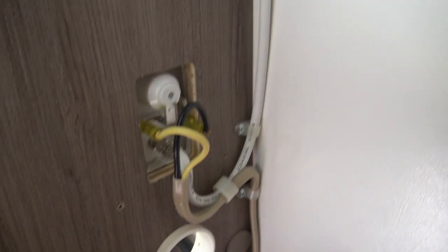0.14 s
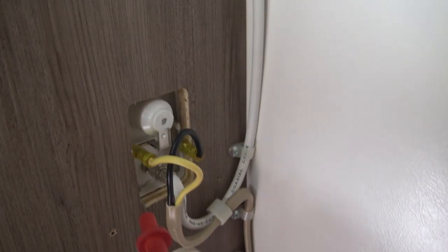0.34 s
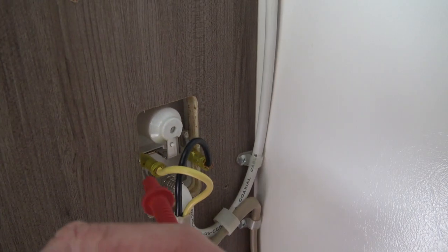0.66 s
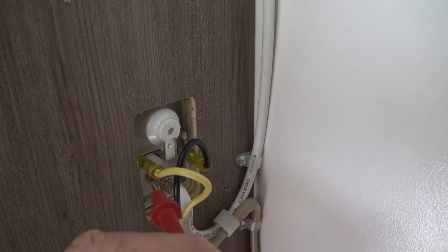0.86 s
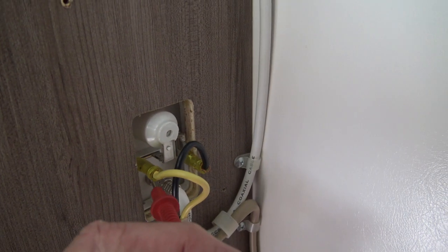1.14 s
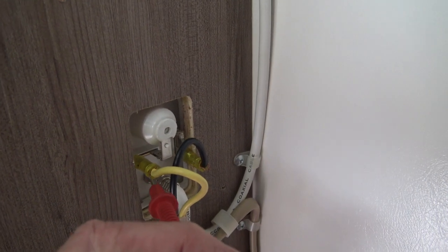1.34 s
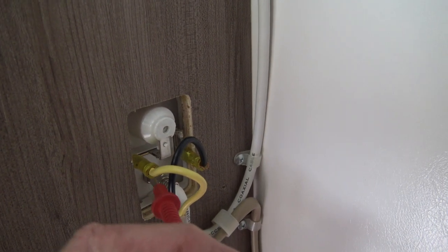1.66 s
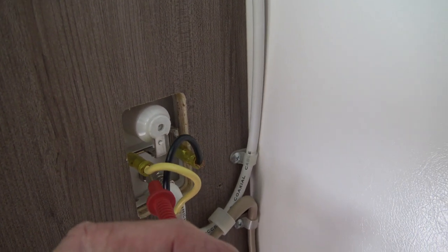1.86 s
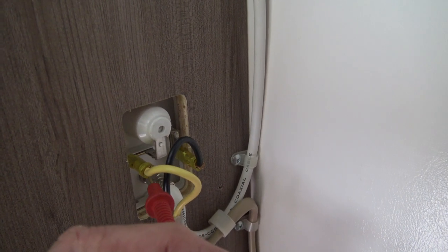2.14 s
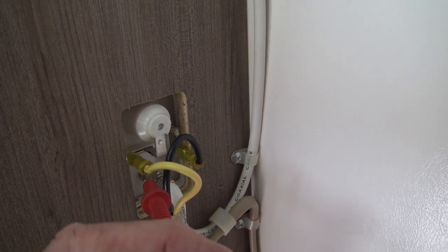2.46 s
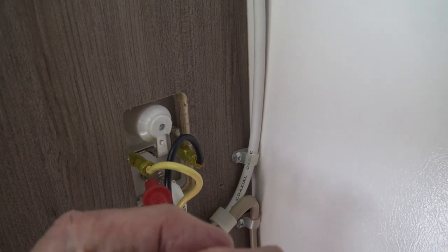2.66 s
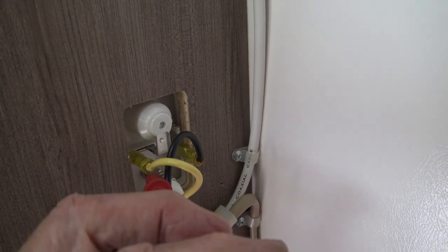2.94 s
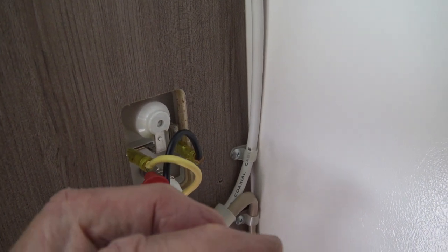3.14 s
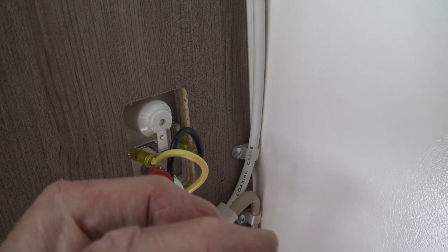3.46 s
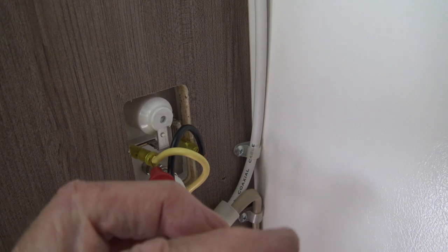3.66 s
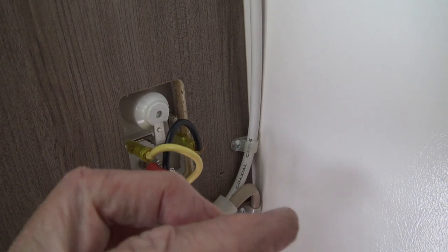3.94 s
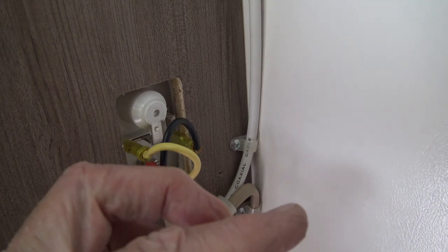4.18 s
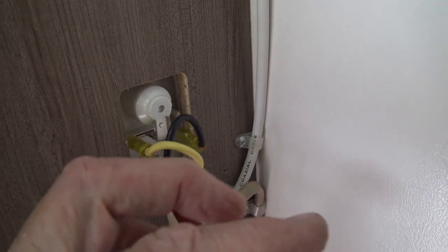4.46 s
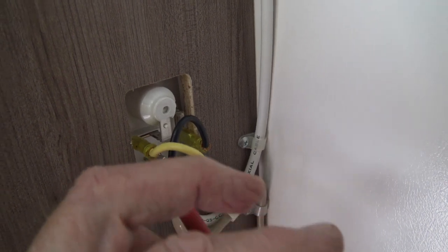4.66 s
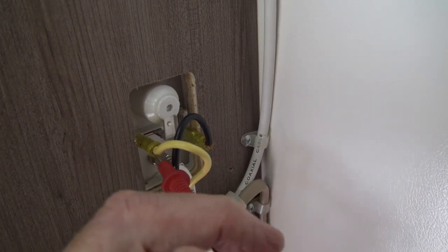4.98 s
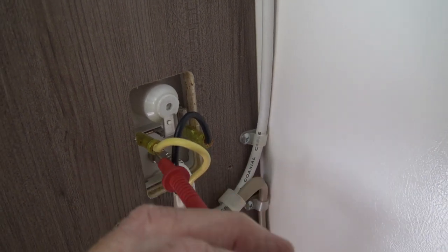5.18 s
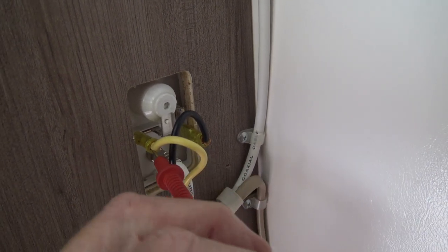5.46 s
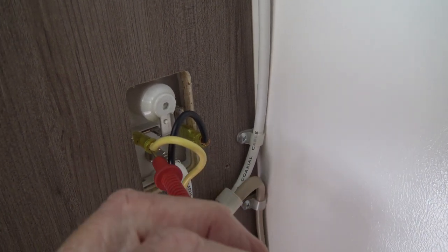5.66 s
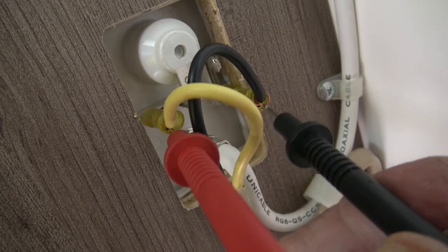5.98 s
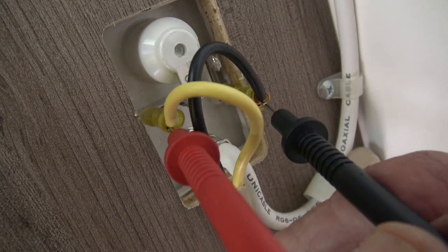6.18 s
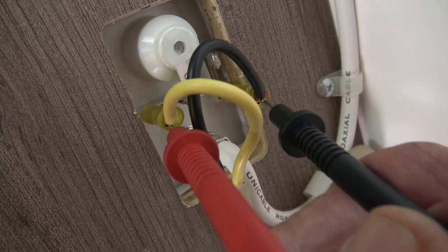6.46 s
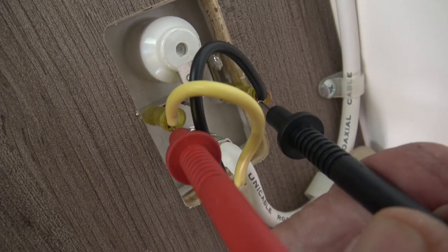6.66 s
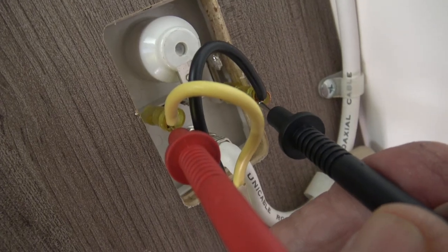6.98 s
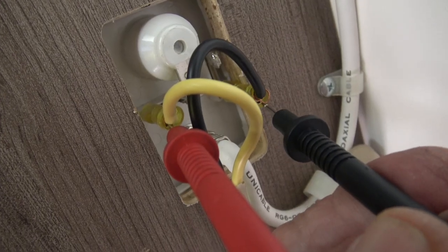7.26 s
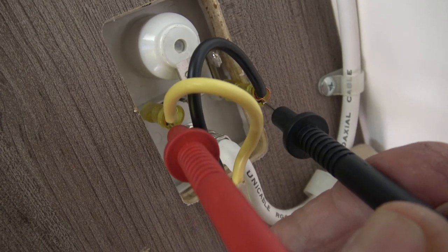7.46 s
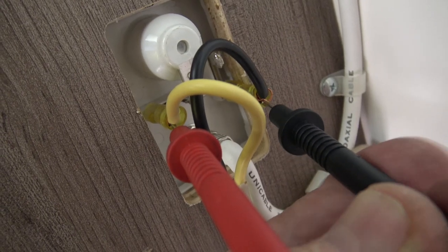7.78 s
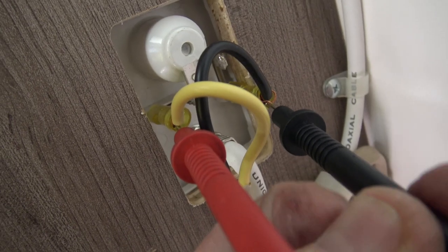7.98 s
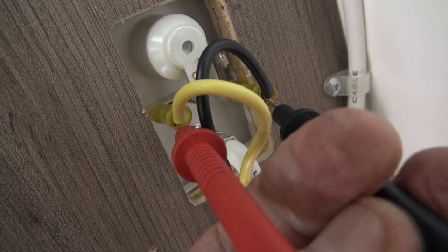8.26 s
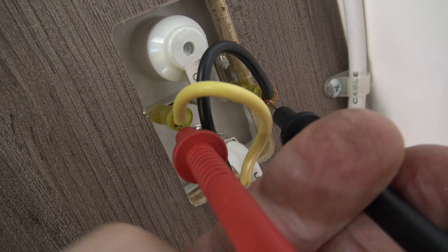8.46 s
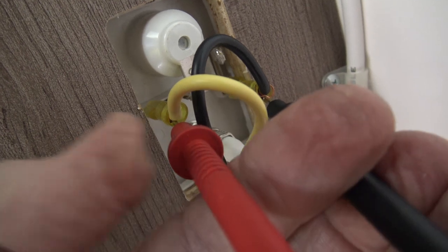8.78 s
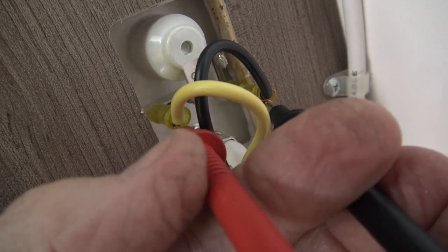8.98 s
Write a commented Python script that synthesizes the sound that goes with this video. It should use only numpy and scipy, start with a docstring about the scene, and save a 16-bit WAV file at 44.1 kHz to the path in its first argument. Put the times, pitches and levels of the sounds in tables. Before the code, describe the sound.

A quiet small cabin with a faint low hum, swelling slightly at the start and fading. At 0-0.4 s, a rustle of skin and leads, soft panel bumps and a tiny squeak; at 0.6 s, crisp metal ticks. Faint scraping follows, then a run of clicks and hollow wooden thuds at 1.5-1.9 s with a thin ping. The strongest tick and booming knock come at 2.8 s, followed by a short scrape. Lighter taps lead to another deep knock at 3.75 s and smaller ones until 4.4 s. Around 4.7-5.5 s, a finger slides over ribbed plastic with breathy, rising whistles. A bright tick at 5.75 s, then shorter, duller clicks on a connector, with scratches near 6.4 s and a sharp hit at 6.6 s. Taps at 7.0 s and a quick scrape-and-knock cluster at 7.6 s, with small treble puffs, thin out after 8.4 s. Close microphone, very short echo.

```python
"""A thin hollow wooden panel booms as hands push test probes against it: damped sines with a soft rise.
Probe tips tick and scrape on a metal wall plate, later on a connector: noise bursts and grains ring metal modes.
A finger slides over ribbed plastic with a gliding, fuzzy whistle; faint squeaks, pings and puffs of treble.
Skin and leads rustle as shaped noise; a quiet cabin hums as steady noise with a low swaying band,
and a short echo of sparse taps follows the close sounds."""
import sys
import numpy as np
from scipy import signal
from scipy.io import wavfile
from scipy.ndimage import uniform_filter1d

SR = 44100
rng = np.random.default_rng(int(sys.argv[2]) if len(sys.argv) > 2 else 0)


def invert_db(level):
    """Linear amplitude ratio for a level in decibels (20 dB per decade), elementwise."""
    return 10 ** (np.asarray(level, dtype=float) / 20)


def to_wav(sig):
    """Store sig (one row per channel, or 1-D mono) as 16-bit WAV at the path in sys.argv[1].

    Samples outside -1..1 are clipped; the rate is SR.
    """
    pcm = np.clip(np.atleast_2d(sig), -1, 1) * 32767
    pcm = np.round(pcm).astype(np.int16)
    wavfile.write(sys.argv[1], SR, pcm.T)  # frames by channels


N = 402015

# wooden panel modes: pitch_hz, level_db, undamped_t60_s, left_over_right_db
PANEL_LOW = [(38.8, -28, 1, 3), (68, -18, 0.042, -4), (118.2, 8, 0.2, 1), (143.7, 4, 0.23, 2)]
PANEL_HIGH = [(201.7, -19, 0.15, 2), (299.9, 9, 0.19, 2.9), (395.4, -1.5, 0.15, 1.5),
              (445.2, 0.5, 0.14, 2.8)]
# metal wall plate modes: pitch_hz, level_db, free_t60_s
PLATE = [(713.6, -8, 0.37), (881, -4, 0.16), (1091, -10.5, 0.33), (1207, 8.5, 0.031), (1482, 3.5, 0.052),
         (1765, -8, 0.065), (1960, 6.5, 0.015), (2240, -11, 0.083), (2710, 1, 0.012), (3500, -11, 0.015)]
# crimped connector modes: pitch_hz, level_db, free_t60_s
CONNECTOR = [(739, -9, 0.071), (695, 0.5, 0.0064), (1740, -14.5, 0.19), (1950, -2.5, 0.019),
             (2750, -9, 0.025), (3300, -15, 0.0075), (4050, -17.5, 0.024)]
REACH_S = 5.95  # from here the tips touch the connector instead of the plate
# how busily the hands move, as the rustle level: time_s, level_db
BUSY = [(0, -26.5), (.04, -38.5), (.3, -37.5), (.5, -48), (.75, -56), (1.5, -56), (2.6, -59.5), (3.3, -56),
        (3.7, -61), (4.0, -52.5), (4.6, -60.5), (5.15, -53.5), (5.42, -53.5), (5.7, -60), (7.7, -64),
        (8.2, -56), (8.4, -60), (9.12, -65.5)]


def evened(x):
    """Scales to unit rms."""
    return x / np.sqrt(np.mean(x ** 2) + 1e-20)


def sides(left_over_right_db):
    """Left and right gains, as a column."""
    return invert_db([[left_over_right_db / 2], [-left_over_right_db / 2]])


def along(rows, column=1):
    """Interpolates a table column over the whole scene."""
    return np.interp(np.arange(N) / SR, [r[0] for r in rows], [r[column] for r in rows])


def add(mix, start_s, sound):
    """Adds a sound in place, cut at the end of the mix."""
    part = mix[:, round(start_s * SR):][:, :sound.shape[1]]
    part += sound[:, :part.shape[1]]


def band(x, lo_hz, hi_hz):
    """Butterworth band-pass."""
    return signal.sosfilt(signal.butter(2, [lo_hz, hi_hz], "band", fs=SR, output="sos"), x)


def ring(modes, count, stretch=1):
    """Each mode as a dying sine, one row a mode; stretch multiplies t60."""
    hz, db, t60_s = np.transpose(modes)[:3, :, None]
    t = np.arange(count) / SR
    return invert_db(db - 60 * t / (t60_s * stretch)) * np.sin(2 * np.pi * hz * t)


def panned(modes, rows):
    """Mixes rung panel modes to two channels, each at its own balance."""
    return np.hstack([sides(m[3]) for m in modes]) @ rows


def grit(per_s, spread_db):
    """Sparse clicks of random sign, a few of them large."""
    size = invert_db(spread_db * np.minimum(rng.exponential(1, N), 4)) * rng.standard_normal(N)
    return size * (rng.random(N) < per_s / SR)


def wander(rows, count, db, smooth_s):
    """Slow random gains, one row each, with an rms of db around 0 dB."""
    width = round(smooth_s * SR / 16)
    noise = rng.standard_normal((rows, count // 16 + 1))
    drift = evened(uniform_filter1d(uniform_filter1d(noise, width), width))
    return np.repeat(invert_db(db * drift), 16, axis=1)[:, :count]


def air(spectrum, patchy_db, apart=1):
    """Two-channel noise of a given spectrum with drifting patches; apart scales the channel difference."""
    # likeness of left and right: pitch_hz, correlation
    likeness = [(60, 0.99), (380, 0.76), (2380, 1), (15000, 0.44)]
    hz = np.fft.rfftfreq(1024, 1 / SR)

    def read(points):
        point_hz, value = np.transpose(points)
        return np.interp(np.log(hz + 1), np.log(point_hz + 1), value)[:, None]

    a, b, c, d, patches = rng.standard_normal((N // 256 + 5, 513, 5)).T
    patches = evened(uniform_filter1d(uniform_filter1d(patches, size=12, axis=0), size=10, axis=1))
    same = np.clip(1 - apart * (1 - read(likeness)), -1, 1)
    shared = np.sqrt((1 + same) / 2) * (a + 1j * b)
    own = np.sqrt((1 - same) / 2) * (c + 1j * d)
    z = np.array([shared + own, shared - own]) * invert_db(read(spectrum) + patchy_db * patches)
    return evened(signal.istft(z, nperseg=1024, noverlap=768)[1][:, :N])


def cabin_hum():
    """Steady shaped noise of the quiet cabin."""
    # relative density: pitch_hz, density_db_per_hz
    cabin_spectrum = [(20, -22), (40, -6), (65, 4), (120, -6), (200, -32), (310, 6), (500, -20), (1000, -9),
                      (2500, -35), (6000, -23), (12000, -29), (16000, -37)]
    return invert_db(-55.5) * air(cabin_spectrum, patchy_db=.6)


def sway():
    """A low hum that swells and fades: narrow noise under a slow level curve."""
    # time_s, level_db
    sway_levels = [(0, -44.5), (1.1, -54), (2.5, -55), (4, -60), (6.2, -61), (9.12, -61.5)]
    noise = rng.standard_normal(N)
    return invert_db(along(sway_levels)) * evened(band(band(noise, 59.3, 76.4), 59.3, 76.4))


def rustle():
    """Skin and leads rub: shaped noise that follows how busily the hands move."""
    # relative density: pitch_hz, density_db_per_hz
    cloth_spectrum = [(290, -13), (500, -21), (1250, -4), (2200, -4), (3860, -7), (11300, -13.5),
                      (16000, -18)]
    return invert_db(along(BUSY)) * air(cloth_spectrum, patchy_db=1.2, apart=.17)


def cabin_echo(x):
    """Sparse taps of random sign dying quickly in the small padded cabin, different in each channel."""
    slots = np.arange(120, 9000, 22)
    at = slots + rng.integers(0, 22, (2, len(slots)))
    taps = np.zeros((2, 9100))
    np.put_along_axis(taps, at, rng.choice([-1., 1.], at.shape) * invert_db(-60 * at / SR / 0.047), 1)
    taps = band(taps, 220, .45 * SR)
    return signal.oaconvolve(x, taps / np.linalg.norm(taps[0]), axes=1)[:, :N]


def puffs():
    """A lead flicks past: short soft-edged bursts of high noise."""
    # start_s, length_s, level_db, lowest_hz
    puff_rows = [(2.219, 0.039, -57, 5000), (2.482, 0.014, -56, 5000), (3.48, 0.023, -55, 5000),
                 (4.477, 0.023, -55.5, 4000), (6.321, 0.018, -53, 4950), (6.779, 0.014, -58.5, 7000),
                 (7.32, 0.021, -56.5, 5000), (7.822, 0.049, -49.5, 6000), (8.063, 0.01, -51.5, 7000),
                 (8.311, 0.041, -55.5, 4930), (8.55, 0.0076, -54, 3000)]
    out = np.zeros((2, N))
    for s, seconds, db, lo_hz in puff_rows:
        noise = rng.standard_normal(round(seconds * SR))
        shape = signal.windows.tukey(len(noise), .6)
        add(out, s, invert_db(db) * evened(band(noise, lo_hz, 12400)) * shape * sides(0))
    return out


def squeaks():
    """Faint metallic squeaks: short soft-edged sines."""
    # start_s, length_s, peak_db, pitch_hz
    squeak_rows = [(0.268, 0.17, -46, 2350), (7.746, 0.016, -51, 3250), (7.876, 0.017, -56, 3300),
                   (7.883, 0.04, -57, 2840)]
    out = np.zeros((2, N))
    for s, seconds, db, hz in squeak_rows:
        t = np.arange(0, seconds, 1 / SR)
        shape = signal.windows.tukey(len(t), .6)
        add(out, s, invert_db(db) * np.sin(2 * np.pi * hz * t) * shape * sides(0))
    return out


def pings():
    """A bare probe tip flicked free rings briefly in its own modes."""
    # start_s, level_db
    ping_rows = [(1.796, -29), (1.884, -44.5)]
    # pitch_hz, level_db, t60_s
    tip_modes = [(3080, -2, .025), (3430, 0, .03), (3850, -3, .025)]
    out = np.zeros((2, N))
    for s, db in ping_rows:
        add(out, s, invert_db(db) * ring(tip_modes, count=4000).sum(0) * sides(-1))
    return out


def slides():
    """A finger on ribbed plastic: a noisy resonance glides up; a second one and a hiss swell and fade over it."""
    # start_s, length_s, level_db
    slide_rows = [(4.727, 0.25, -58.5), (5.057, 0.25, -48.5), (5.262, 0.24, -46.5)]
    # bandwidth_hz of the lower and the upper resonance
    widths_hz = 340, 800
    from_hz, to_hz, glide_s, upper_ratio = 3500, 4120, 0.041, 1.3
    rise_s, fade_db = 0.035, -23.5
    out = np.zeros((2, N))
    for s, seconds, db in slide_rows:
        t = np.arange(0, seconds, 1 / SR)
        hz = to_hz + (from_hz - to_hz) * np.exp(-t / glide_s)
        noise = rng.standard_normal((6, len(t)))
        wobble = np.array([signal.lfilter([1], [1, -np.exp(-np.pi * width / SR)], noise[k] + 1j * noise[k + 2])
                           for k, width in enumerate(widths_hz)])
        phase = 2 * np.pi * np.cumsum(hz * [[1], [upper_ratio]], axis=1) / SR
        low, high = evened((wobble * np.exp(1j * phase)).real)
        swell = np.sin(np.pi * (t / seconds) ** 1.25) ** 2
        hiss = swell * (1.2 * high + 0.8 * evened(band(noise[4:], 4600, 7000)))
        shape = np.minimum(t / rise_s, 1) * invert_db(db + fade_db * (t / seconds) ** 2)
        add(out, s, shape * (low + hiss) * signal.windows.tukey(len(t), .3))
    return out


def drag():
    """Dense slips of the tips ring the metal: a faint creep that follows the rustle, and distinct strokes."""
    # strokes of a tip: start_s, length_s, level_db, swell_db from start to end
    stroke_rows = [(0.827, 0.12, -48, 0), (1.289, 0.11, -47, 12), (2.212, 0.097, -55, -21),
                   (2.815, 0.07, -36.5, -20), (3.34, 0.05, -49.5, -3), (3.859, 0.061, -50.5, 1),
                   (4.324, 0.81, -62, -3), (5.978, 0.11, -65, -5), (6.337, 0.093, -41.5, 16),
                   (6.472, 0.098, -39.5, 10), (6.551, 0.087, -50, 9), (7.35, 0.067, -54.5, -7),
                   (7.582, 0.034, -29.5, 21), (8.145, 0.23, -66, 15)]
    quiet_db, creep_db, creep_share = -59, -63, 0.76  # creep_db at a rustle of quiet_db; dB per dB of rustle
    judder_db, judder_s = 1.5, .004  # a dragged tip stutters
    wander_db, wander_s = 3.5, .02  # favours now one mode, now another
    bend_share, bend_s = .04, .03  # and its changing pressure bends their pitch
    rub_damping = .4  # a resting tip shortens the ring of the metal to this share

    t = np.arange(N) / SR
    level = invert_db(creep_db + creep_share * (along(BUSY) - quiet_db))
    catches = signal.lfilter([1], [1, -np.exp(-1 / (0.0043 * SR))], abs(grit(12.0, 1.8)))
    level *= 1 + .5 * catches
    for start, seconds, db, swell_db in stroke_rows:
        gate = np.clip(np.minimum((t - start) / 0.0096, (start + seconds - t) / 0.028), 0, 1)
        level += gate * invert_db(db + swell_db * np.clip((t - start) / seconds - .5, -.5, .5))
    level *= wander(1, N, judder_db, judder_s)[0]

    slips = band(band(grit(14000, 1.2), 230, 4700), 125, 6700)
    before, after = np.split(slips, [round(REACH_S * SR)])
    rung = []
    for part, modes in ((before, PLATE), (after, CONNECTOR)):
        responses = ring(modes, count=2000, stretch=rub_damping)
        rows = signal.oaconvolve(part[None], responses, axes=1)[:, :len(part)]
        rung.append(evened((rows * wander(len(modes), len(part), wander_db, wander_s)).sum(0)))
    # reading the ring at a varying speed bends its pitch
    read_at = np.cumsum(wander(1, N, 20 * np.log10(1 + bend_share), bend_s))
    bent = np.interp(read_at * (N - 1) / read_at[-1], np.arange(N), np.hstack(rung))
    return level * (bent + 0.27 * evened(slips)) * sides(-1.2)


def ticks():
    """Probe tips strike metal and plastic: three noise bands, the treble dying first, plus rung metal modes."""
    # start_s, level_db, hardness (0 a plain knock, 1 a bare tip on metal)
    tick_rows = [(0.243, -43, -0.42), (0.3281, -34.5, 0.066), (0.605, -25.5, 0.56), (0.636, -32.5, 0.54),
                 (1.1006, -44, 0.31), (1.4655, -34.5, 0.56), (1.532, -30.5, 0.26), (1.594, -38, 0.68),
                 (1.646, -35.5, 0.21), (1.7122, -27, 0.43), (1.796, -43.5, 1.1), (1.851, -46.5, 0.51),
                 (1.883, -43.5, 0.22), (2.746, -40, -0.33), (2.8055, -12.5, 0.23), (2.8658, -30, 0.44),
                 (3.084, -34, 0.85), (3.277, -36.5, 0.31), (3.372, -53.5, -0.59), (3.619, -46.5, -0.89),
                 (3.7482, -33.5, 0.66), (3.957, -31.5, 0.54), (4.022, -60, 1.55), (4.2198, -37, 0.16),
                 (4.3128, -39, 0.32), (4.401, -50.5, -0.96), (4.844, -43, -0.15), (5.2472, -41.5, -0.75),
                 (5.4928, -62, 1.48), (5.7408, -29, 1.3), (5.875, -34.5, 0.41), (6.034, -51.5, -0.44),
                 (6.1638, -36, 0.2), (6.346, -41.5, 0.53), (6.4193, -36.5, 0.31), (6.573, -22, 0.27),
                 (6.5806, -28.5, 0.85), (7.012, -26.5, 0.18), (7.111, -31.5, 0.28), (7.2053, -43.5, -0.12),
                 (7.2903, -41.5, 0.28), (7.3642, -40.5, 0.22), (7.582, -33, 0.29), (7.6012, -26.5, 0.17),
                 (7.625, -23.5, 0.12), (7.7632, -38, -0.024), (7.801, -49.5, 0.78), (7.8232, -38.5, -0.29),
                 (8.043, -38, -0.51), (8.2022, -40, -0.46), (8.2606, -35.5, 0.13)]
    usual_db, bright_loss_per_db = -44, 0.2962  # blows above usual_db gain less treble than body
    spot_db, spot_detune = 3, .02  # every contact lands elsewhere, weighting and shifting the modes anew
    out, t = np.zeros((2, N)), np.arange(4000) / SR
    snap = 1 + 1.05 * np.exp(-t / 0.0017)  # the first contact stands out of the burst

    def fade(t60_s, rise_s):
        return invert_db(-60 * t / t60_s) * (1 - np.exp(-t / rise_s))

    for s, db, hardness in tick_rows:
        # harder contacts sit higher, lose their dull part, gain treble and build up faster
        hz = 1847 * 2 ** hardness
        dull_db = 2 - 13 * hardness
        bright_db = -18.5 + 19 * hardness - bright_loss_per_db * (db - usual_db)
        rise_s = 0.001 / 2 ** (1.83 * hardness)
        noise = rng.standard_normal((3, 4000))

        modes = np.array(PLATE if s < REACH_S else CONNECTOR, float)
        shift, weight = rng.standard_normal((2, len(modes)))
        modes[:, 0] *= 1 + spot_detune * shift
        modes[:, 1] += spot_db * weight
        metal = signal.fftconvolve(noise[0], ring(modes, count=2000).sum(0))[:4000]
        body = noise[1] + 0.65 * evened(metal)

        dull = invert_db(dull_db) * evened(band(body, 237, 784)) * fade(0.1, rise_s)
        middle = evened(band(body, hz / 4.77, hz * 1.25)) * fade(0.079, rise_s) * snap
        bright = invert_db(bright_db) * evened(band(noise[2], 3500, 10500)) * fade(0.064, 1.7 * rise_s) * snap
        # clear ring of the struck metal, damped to a share of its free t60
        knock = ring(modes, count=4000, stretch=.6).sum(0)
        struck = invert_db(7) * knock / abs(knock).max() * (1 - np.exp(-t / rise_s))
        add(out, s, invert_db(db) * sides(-0.67) * (dull + middle + bright + struck))
    return out


def panel_tremble():
    """A resting hand shakes the panel all the time: small clicks ring its modes."""
    # time_s, lower_modes_db, upper_modes_db
    lean_levels = [(0, -49.5, -42.5), (.5, -52, -54.5), (2.6, -53, -60.5), (4.1, -49.5, -51),
                   (4.7, -42, -41.5), (5, -52, -56), (6, -51, -52), (6.7, -51, -49), (7.5, -53, -57.5),
                   (8.4, -53, -46.5), (9.12, -54.5, -78)]
    out = np.zeros((2, N))
    for column, modes in enumerate((PANEL_LOW, PANEL_HIGH), 1):
        shake = band(grit(500, 1.5), 70, 900)
        response = panned(modes, ring(modes, count=9000))
        tremble = signal.oaconvolve(shake[None], response, axes=1)[:, :N]
        out += invert_db(along(lean_levels, column)) * evened(tremble)
    return out


def panel_pushes():
    """Each push rings the panel modes after a soft rise; the flesh of the hand adds a broad dull puff."""
    # start_s, level_db, upper_over_lower_db, t60_factor (damping by the hand)
    push_rows = [(0.26, -26.5, -34, 0.41), (0.289, -32, -6.5, 0.27), (0.325, -23, -15, 0.31),
                 (0.37, -32.5, -14, 0.54), (0.607, -44.5, 12, 0.74), (1.532, -37.5, 2, 0.73),
                 (1.591, -21, -8, 0.66), (1.711, -19, -6.5, 0.65), (1.854, -36, -3, 0.66),
                 (2.08, -35, -5, 0.62), (2.23, -36, 4, 0.71), (2.743, -28.5, 0.5, 1.0),
                 (2.805, -7.5, -9.5, 0.75), (2.832, -13.5, -15.5, 0.65), (2.865, -31, -20, 1),
                 (3.272, -21, -14, 0.77), (3.354, -25, -10.5, 0.73), (3.616, -26.5, -10, 0.89),
                 (3.689, -26, -9.5, 0.93), (3.744, -7.5, -8, 0.79), (3.95, -13, -17, 0.85),
                 (3.984, -22.5, -16, 0.41), (4.185, -28.5, -19, 0.62), (4.217, -17, -4.5, 0.78),
                 (4.304, -29, 0.5, 0.92), (4.391, -34.5, 5.5, 0.75), (4.806, -34, -2, 1.0),
                 (4.947, -32, -7, 0.58), (5.179, -29, -14, 0.55), (5.249, -21.5, -3.5, 0.58),
                 (5.88, -25.5, -5.5, 0.55), (6.162, -36, -1, 0.55), (6.425, -25.5, -3.5, 0.48),
                 (6.578, -23, -2, 0.55), (6.91, -45, 13, 0.79), (7.016, -23.5, -4, 0.59),
                 (7.363, -39.5, 2, 0.97), (7.599, -17, -13.5, 0.48), (7.622, -34, 1, 0.53),
                 (7.762, -35, 0, 0.5), (7.826, -25, -7, 0.63), (8.043, -20, -0.5, 0.58),
                 (8.205, -29, -3.5, 0.77), (8.26, -32.5, 6, 0.51), (8.349, -32.5, -4, 0.56)]
    light_push_db, rise_doubles_per_db = -30, 0.18  # lighter pushes wake the upper modes more slowly
    out, t = np.zeros((2, N)), np.arange(9000) / SR
    for s, db, upper_db, damping in push_rows:
        # each push lands elsewhere and weights the modes anew
        spot_high = invert_db(1.2 * rng.standard_normal((len(PANEL_HIGH), 1)))
        spot_low = invert_db(0.8 * rng.standard_normal((len(PANEL_LOW), 1)))
        high_rise_s = 0.0087 * 2 ** (rise_doubles_per_db * max(light_push_db - db, 0))
        low = spot_low * ring(PANEL_LOW, count=9000, stretch=damping) * (1 - np.exp(-(t / 0.014) ** 2))
        high = spot_high * ring(PANEL_HIGH, count=9000, stretch=damping) * (1 - np.exp(-(t / high_rise_s) ** 2))
        puff = evened(band(rng.standard_normal(9000), 160, 392))
        puff = puff * invert_db(-12.5 - 60 * t / 0.16) * (1 - np.exp(-t / 0.0024))
        boom = panned(PANEL_LOW, low) + invert_db(upper_db) * panned(PANEL_HIGH, high)
        add(out, s, invert_db(db) * (puff * sides(2.2) + boom))
    return out


def scene():
    """Sums the background, the close sounds with their echo, and the panel."""
    background = cabin_hum() + sway() + rustle()
    near = puffs() + squeaks() + pings() + slides() + drag() + ticks()
    panel = panel_tremble() + panel_pushes()
    return background + near + invert_db(-17.0) * cabin_echo(near) + panel


def band_limit(x):
    """A steep low-pass at the top of the band."""
    return signal.sosfilt(signal.butter(12, 16980, fs=SR, output="sos"), x)


def record(dry):
    """Limits the band with a steep linear-phase low-pass."""
    edge_hz = 15950
    lowpass = signal.firwin(511, edge_hz, window=("kaiser", 9), fs=SR)
    limited = signal.oaconvolve(dry, lowpass[None], "same")
    return band_limit(limited)


dry = scene()
out = record(dry)
to_wav(out)
```